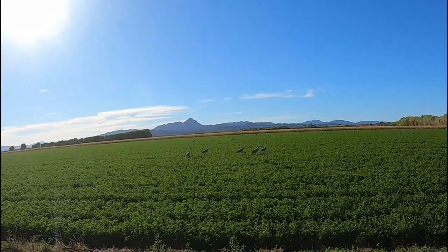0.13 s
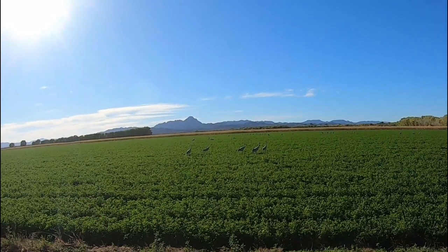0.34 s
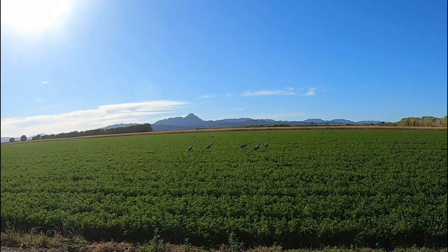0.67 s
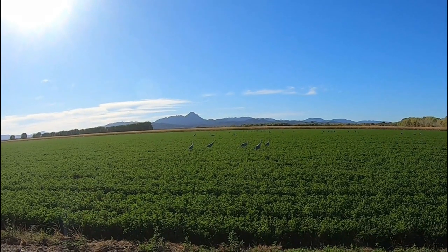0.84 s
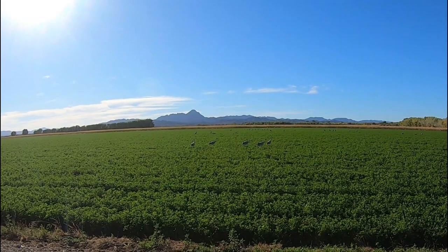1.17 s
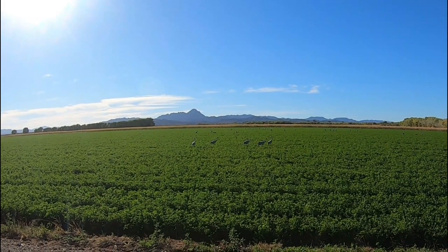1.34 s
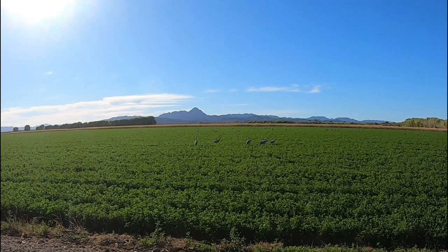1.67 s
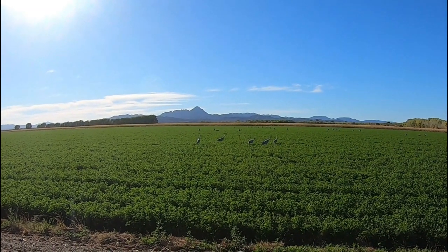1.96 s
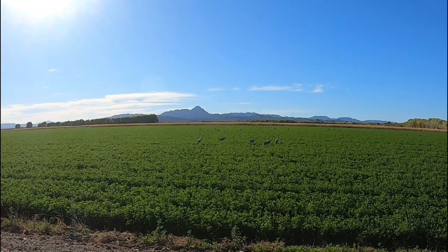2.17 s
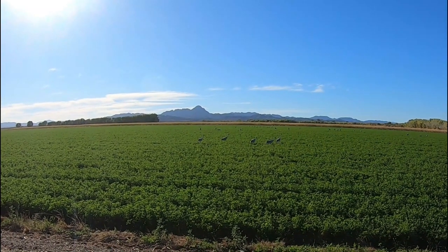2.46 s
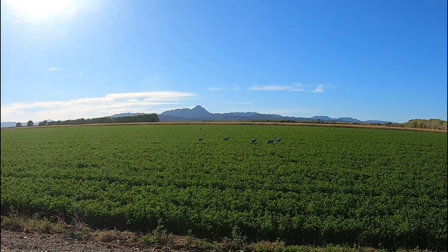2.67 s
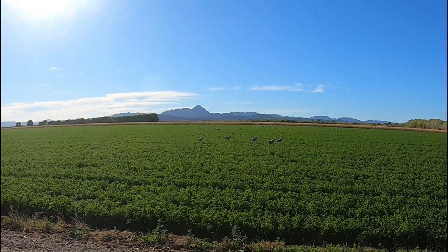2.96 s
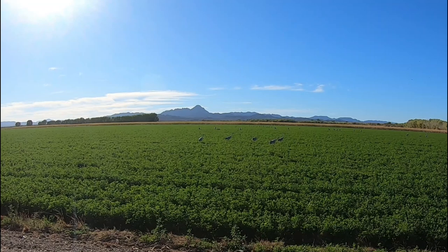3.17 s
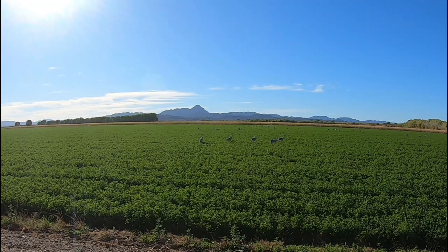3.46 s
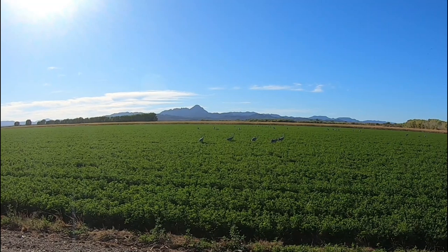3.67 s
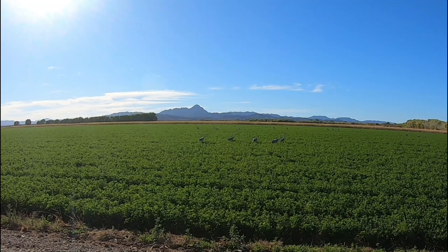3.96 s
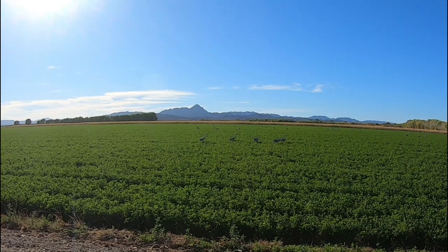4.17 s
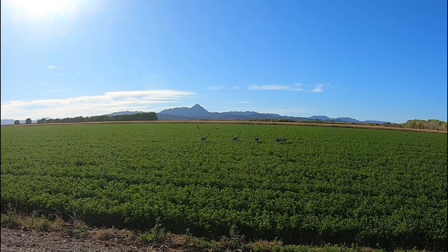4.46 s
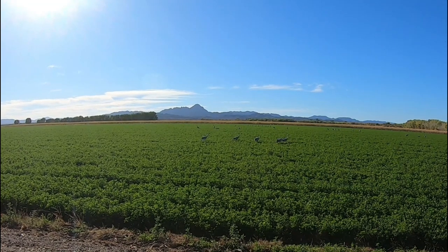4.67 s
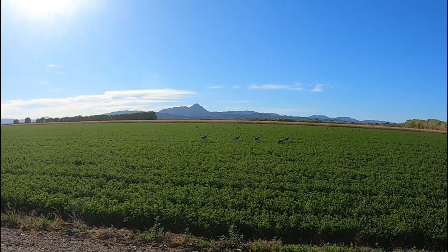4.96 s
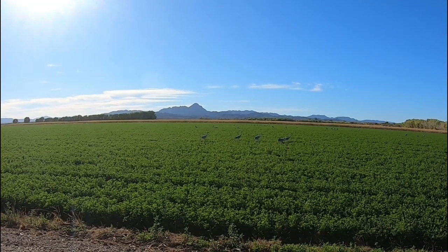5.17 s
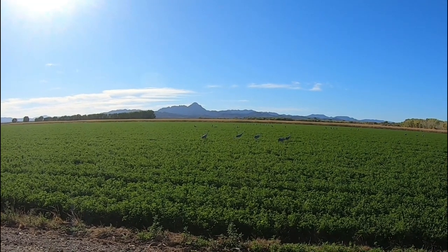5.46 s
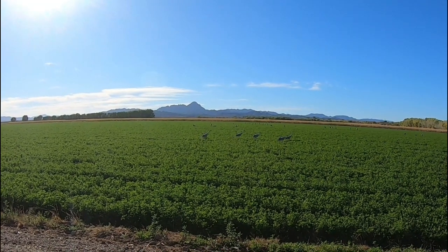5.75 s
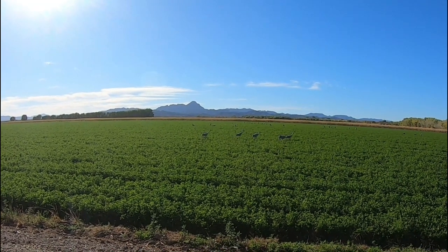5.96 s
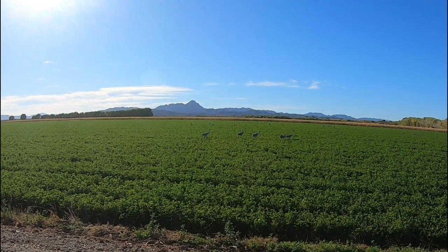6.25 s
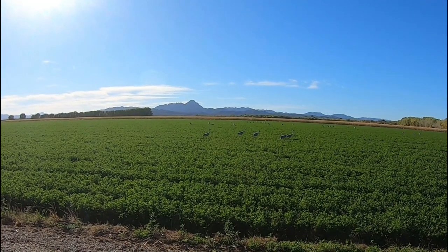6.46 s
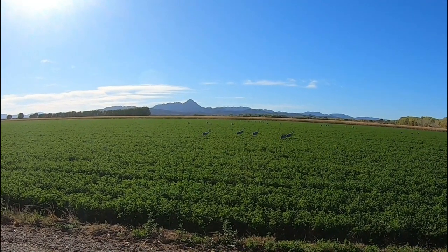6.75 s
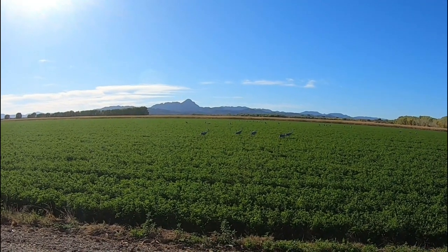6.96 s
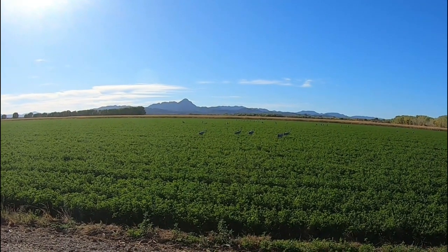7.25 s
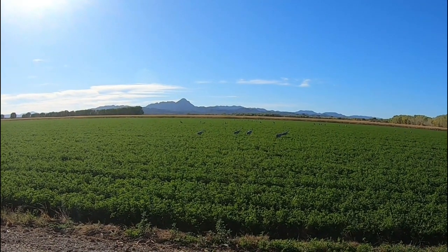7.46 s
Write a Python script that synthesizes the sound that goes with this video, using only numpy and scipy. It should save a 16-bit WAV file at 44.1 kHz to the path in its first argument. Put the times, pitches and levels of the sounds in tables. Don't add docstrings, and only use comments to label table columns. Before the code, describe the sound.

A low engine idle throbs close by throughout, around 24 pulses per second, swelling slightly near 3 s, with soft open-field hiss and light gusts through leaves, notably around 5 s. At about 0.3 s an adult crane gives a short, brassy rising bugle, immediately followed by a rolling rattle of eight quick, rough, beating notes that shorten and fade by 0.9 s. A young crane joins at 0.5 s with a thin steep whistle near 3-4 kHz, then fluttering trills drifting downward. Similar exchanges follow at about 1.9-2.6 s, 3.8-4.5 s and 5.4-6.1 s; the third bugle is softer and brighter, the last rattle longest and strongest. Faint breathy clucks from farther birds dot the scene, and the crop blurs calls into a tiny echo. After 6 s the leaves calm, a faint insect buzzes, and one weak juvenile whistle sounds at 7.5 s.

```python
import sys
import numpy as np
from scipy import signal
from scipy.fft import rfft, irfft, next_fast_len
from scipy.io import wavfile
from scipy.ndimage import map_coordinates

SR = 44100
rng = np.random.default_rng(int(sys.argv[2]) if len(sys.argv) > 2 else 0)


def convert_level_to_amplitude(level_db):
    exponent = np.asarray(level_db, float) / 20
    return 10 ** exponent


def to_wav(sig):
    pcm = np.clip(np.atleast_2d(sig), -1, 1) * 32767
    pcm = np.round(pcm).astype(np.int16)
    wavfile.write(sys.argv[1], SR, pcm.T)


N = 335601


def unit(x):
    return x / np.sqrt(np.mean(x ** 2) + 1e-20)


def along(points, hz):
    f, v = np.transpose(points)
    return np.interp(np.log(hz + 1), np.log(f + 1), v)


def curves(rows, t):
    s, *cols = np.transpose(rows)
    return [np.interp(t, s, c) for c in cols]


def wobble(rate, size=N):
    knots = rng.standard_normal(int(size * rate / SR) + 4)
    return map_coordinates(knots, [np.arange(size) * rate / SR])


def filtered(x, response):
    n = x.shape[-1]
    m = next_fast_len(n + 4096)
    return irfft(rfft(x, m) * response(np.fft.rfftfreq(m, 1 / SR)), m)[..., :n]


def add(track, s, sound):
    part = track[max(round(s * SR), 0):][:len(sound)]
    part += sound[:len(part)]


def phase(hz):
    return 2 * np.pi * np.cumsum(hz) / SR


def field():
    # hz, level_db (per Hz)
    floor = [(15, -47.5), (25, -27), (45, -15.5), (65, -14), (110, -14.5), (170, -21), (279, -24.5),
             (511, -32.5), (667, -37.5), (937, -38), (1940, -41), (2530, -49), (5360, -59.5), (9830, -74),
             (12800, -110), (21600, -120)]
    # hz, likeness (0 to 1)
    alike = [(170, 0.97), (350, 0.98), (550, 0.79), (750, 0.1), (1050, 0.086), (1500, 0.54), (2300, 0.31),
             (3500, .55), (6000, 0.076), (9000, 0.081)]
    # start_s, level_db
    insect = [(0, -92.5), (5.9, -99), (6.2, -78.5), (6.8, -82), (7.61, -89)]
    # middle_s, change_db, half_length_s
    gusts = [
        (0, 7, 0.063),
        (1.352, 7, 0.054),
        (5.1, 10, 0.2),
        (7, -9, .95),
    ]
    t = np.arange(N) / SR

    def hiss_shape(hz):
        whine = 1 + 3.55 / (1 + ((hz - 668) / 22) ** 2)
        spread = np.arccos(np.clip(along(alike, hz), -1, 1)) / 2
        return convert_level_to_amplitude(along(floor, hz)) * whine * [np.cos(spread), np.sin(spread)]

    patchy = rng.standard_normal((2, N)) * convert_level_to_amplitude(.5 * wobble(14))
    mid, side = filtered(patchy, hiss_shape)
    low = np.std(filtered(mid, lambda hz: (hz > 200) & (hz < 500)))
    hiss = np.array([mid + side, mid - side]) / low
    leaves = filtered(hiss, lambda hz: hz ** 4 / (hz ** 4 + 10600.0 ** 4))
    breeze_db = 1.4 + sum(db * np.exp(-((t - s) / half) ** 4) for s, db, half in gusts)
    buzz = unit(filtered(rng.standard_normal((2, N)), lambda hz: np.exp(-((hz - 5400) / 260) ** 2)))
    wingbeat = 1 + np.sin(2 * np.pi * 55 * t)
    buzz = buzz * convert_level_to_amplitude(curves(insect, t)[0]) * wingbeat
    return (hiss + (convert_level_to_amplitude(breeze_db) - 1) * leaves) * convert_level_to_amplitude(-51) + buzz


def engine():
    # start_s, firing_hz, first_tone_db
    idle = [(0, 24.63, -26.5), (0.53, 24.53, -25.5), (1.0, 24.37, -30.5), (1.31, 24.2, -29),
            (2.12, 24.45, -28), (2.67, 24.87, -21), (2.88, 25.61, -21), (3.03, 25.14, -22),
            (3.79, 24.34, -27.5), (3.96, 24.37, -32), (4.43, 24.39, -28.5), (4.89, 24.14, -33.5),
            (5.3, 24.1, -35), (5.81, 23.92, -30.5), (7.61, 23.77, -30.5)]
    # multiple (of the firing rate), level_db
    hum = [(1.5, -48.5), (2.5, -59), (3, -50.5), (3.5, -66), (4, -57.5), (4.5, -49.5), (5, -49),
           (5.5, -58.5), (6, -56.5), (7, -51), (8, -57.5), (9, -67), (11, -61)]
    t = np.arange(N) / SR
    hz, first_db = curves(idle, t)
    turn = phase(hz)
    second_db = -36 + 0.4946 * t - 0.22 * np.clip(first_db + 28.5, 0, None) ** 2
    out = convert_level_to_amplitude(first_db + 1.0 + 1.2 * wobble(3.8)) * np.sin(turn)
    out = out + convert_level_to_amplitude(second_db + 2.5 + 0.68 * wobble(4.6)) * np.sin(2 * turn + 1.82)
    for k, db in hum:
        angle = k * turn + .5 * wobble(3.022) + rng.uniform(0, 2 * np.pi)
        out = out + convert_level_to_amplitude(db + 2 + 1.77 * wobble(4.6)) * np.sin(angle)
    return out * convert_level_to_amplitude([[-.35], [.35]])


def clucks():
    # start_s, peak_db, centre_hz
    puffs = [(0.0249, -48, 2750), (1.1116, -56, 3000), (1.1892, -51.5, 3370), (1.353, -51.5, 2960),
             (2.657, -49.5, 3780), (2.879, -50.5, 2812), (3.1362, -46, 3100), (4.673, -46, 3372),
             (6.2095, -41, 3176), (.316, -42, 900), (5.534, -47, 850), (5.543, -35, 898)]
    out, t = np.zeros(N), np.arange(SR // 30) / SR
    for s, db, hz in puffs:
        noise = rng.standard_normal(len(t))
        puff = unit(filtered(noise, lambda f: 1 / (1 + ((f - hz) / (0.4 * hz)) ** 2) ** 2))
        shape = (1 - np.exp(-(t / 0.0023) ** 2)) * convert_level_to_amplitude(-60 * t / 0.059)
        add(out, s - .002, convert_level_to_amplitude(db - 4.5) * puff * shape)
    return out


def voiced(pitch_hz, throat, tilt_db, start=0, drift_db=0, odd_db=0, third_db=0, top_db=0):
    turn = phase(pitch_hz) + start
    voice = 0
    for k in range(1, 25):
        hz = k * pitch_hz
        level_db = along(throat, hz) + tilt_db * np.log2(k) + third_db * (k == 3)
        level_db = level_db + odd_db * (k % 2) * (k > 6) + top_db * max(k - 7, 0)
        if drift_db:
            level_db = level_db + drift_db * (1 + 1.2 * (k > 6)) * wobble(48.0, len(turn))
        voice = voice + convert_level_to_amplitude(level_db) * np.cos(k * turn + 0.36 * k) * (hz < SR / 2.5)
    return voice


def bugles():
    # crest_s, rise_hz, level_db, brightness_db (per octave)
    calls = [
        (0.406, 74.6, -32.5, 0.5),
        (2.002, 85.6, -32.5, 0.5),
        (4.002, 81.1, -36, 4),
        (5.619, 48.2, -34.5, 2.5),
    ]
    # time_s (from the crest), rise_left (share), level_db, brightness_db (per octave), hoarseness_db
    shape = [(-.087, 1.35, -17.5, 0, 3), (-.076, .95, -4, -6.5, -16), (-.06, .62, -3.5, -1.5, -35),
             (-.03, .2, -3, 1.5, -35), (-.012, 0.071, -7.5, 1.5, -33), (-.002, .06, 1.5, -1, -21),
             (.004, 0.14, -4, -8.5, 0), (.012, .2, -9, -14, -15), (0.023, 0.22, -23, -17, -24)]
    # time_s, pitch_hz
    pitches = [
        [(0.32, 536), (0.332, 532), (0.344, 557.4), (0.396, 608.6), (0.41, 598)],
        [(1.92, 527), (1.926, 525), (1.94, 567), (1.982, 608.3), (2.006, 610)],
        [(3.92, 523), (3.934, 554), (3.978, 605), (4.006, 609)],
        [(5.55, 559), (5.58, 614), (5.604, 630.4), (5.623, 606)],
    ]
    odd_levels = [-2, 4, 1.5, 1.5]
    # hz, level_db
    turned = [(450, -26), (600, -12.5), (850, 4), (1200, -0.5), (1800, -6), (2400, -18.5), (3050, -19),
              (3600, -9), (4250, -34), (4900, -25.5), (5500, -31), (7500, -40), (9800, -46), (16000, -82)]
    level_head = [(450, -35), (600, -4.5), (850, 5), (1200, 0), (1800, -3), (2400, -15), (3050, -9.5),
                  (3600, -12.5), (4250, -25), (5500, -30), (7500, -43), (9800, -46), (12500, -68),
                  (16000, -83)]
    lowered = [(450, -25), (600, -4.5), (850, 9), (1200, -2), (1800, -4), (2400, -15.5), (3050, -14.5),
               (3600, -13.5), (4250, -24), (4900, -23), (5500, -27), (7500, -43), (9800, -53), (16000, -83)]
    raised = [(450, -25), (620, -1.5), (850, 10.5), (1240, -2), (1870, -1.5), (2500, -20), (3120, -8.5),
              (3750, -17), (4350, -18), (5000, -25), (5600, -22), (7500, -49), (9800, -53), (16000, -78.5)]
    throats = [turned, level_head, lowered, raised]
    full_rise_hz, least_lead = 84.3, 0.67
    out = np.zeros(N)
    for (s, rise_hz, level_db, bright_db), pitch, odd_db, throat in zip(calls, pitches, odd_levels, throats):
        effort = rise_hz / full_rise_hz
        lead = least_lead + (1 - least_lead) * effort
        t = np.arange(lead * shape[0][0], shape[-1][0], 1 / SR)
        rising = t < 0
        left, db, tilt_db, hoarse_db = curves(shape, np.where(rising, t / lead, t))
        hz = curves(pitch, s + t)[0] + 3000 * np.clip(t - .003, 0, 1)
        weak = (1 - effort) * np.clip(left - .2, 0, .6) * rising
        tilt_db = tilt_db + bright_db - 7 * weak
        hoarse_db = np.minimum(hoarse_db + 50 * weak, 0)
        third_db = -20 * np.clip(left - .25, 0, .8) * rising
        top_db = -3.5 * np.clip(left - .1, 0, 1) * rising
        hz = hz * (1 + 0.0006 * wobble(160, len(t)))
        voice = voiced(hz, throat, tilt_db, drift_db=1.4, odd_db=odd_db, third_db=third_db, top_db=top_db)
        breath = rng.standard_normal(len(t))
        breath = unit(filtered(breath, lambda f: convert_level_to_amplitude(along(throat, f)) / (1 + (f / 4200) ** 4)))
        ends = signal.windows.tukey(len(t), .1)
        add(out, s + t[0], convert_level_to_amplitude(db + level_db + 1.5) * (voice + convert_level_to_amplitude(hoarse_db) * breath) * ends)
    return out


def rattle_notes():
    # start_s, peak_db, lower_fold_db
    calls = [
        [(0.4724, -24, 1.5), (0.547, -19, -5), (0.6057, -22, -0.5), (0.6548, -20.5, -8.5), (0.7017, -23, -3.5),
         (0.7422, -27.5, 0.5), (0.7848, -29.5, -0.5), (0.8235, -35.5, -3)],
        [(2.0662, -23.5, 1), (2.1394, -19.5, -4), (2.2005, -19.5, -6), (2.2506, -19, -10), (2.2965, -23.5, -3),
         (2.339, -24, -3), (2.3789, -25.5, 0.5), (2.419, -29, -0.5)],
        [(4.067, -22.5, 0.5), (4.141, -19, -4.5), (4.2, -19.5, -5), (4.2497, -18.5, -5.5), (4.298, -20.5, -4.5),
         (4.341, -21, -5.5), (4.3815, -24, -6), (4.4216, -26.5, -2), (4.457, -46.5, 17.5)],
        [(5.686, -20.5, -4), (5.758, -18.5, -6.5), (5.8161, -18.5, -6.5), (5.8676, -19, -7.5),
         (5.9119, -19.5, -7), (5.9545, -21.5, -6), (5.9914, -24.5, -2), (6.0298, -31, 3.5), (6.065, -44, 12.5)],
    ]
    brights = [-2.5, -1.35, 1.5, 2]
    sheens = [4, 2.5, -7, 0.5]
    touches = [-11, -7, -2, -3]
    for notes, bright_db, sheen_db, touch_db in zip(calls, brights, sheens, touches):
        for s, db, lower_db in notes:
            since = s - notes[0][0]
            upper_hz = 906.4 - 4900 * max(since - 0.1974, 0) ** 2
            life_s = 0.0066 + 0.019 * np.exp(-since / 0.31)
            yield s, db, upper_hz, lower_db, life_s, bright_db, sheen_db, since == 0, touch_db


def windpipe_rings(t, life_s, first):
    size = len(t)
    pipe_hz = 1748 * (1 - 0.32 * t) + 9 * wobble(150, size)
    pipe = convert_level_to_amplitude(-8 + 1.5 * wobble(100, size)) * np.exp(-t / (1.1 * life_s)) * np.cos(phase(pipe_hz))
    lower = convert_level_to_amplitude(-19 + 9 * first) * np.minimum(t / 0.022, 1) * np.sin(2 * np.pi * (1600 - 48 * first) * t)
    nasal_db = -22.5 + 3 * wobble(120, size)
    nasal = convert_level_to_amplitude(nasal_db) * np.sin(phase(2233 + 40 * wobble(120, size)))
    return pipe + lower + nasal


def rattle():
    # hz, level_db
    throat = [(450, -56), (650, -4), (850, 8.5), (1150, -2.5), (1450, -16.5), (1720, -5.5), (2150, -8.5),
              (2620, -22), (3300, -9), (4100, -21), (5600, -26), (9500, -47), (12000, -59.5),
              (16000, -83.5)]
    out, t = np.zeros(N), np.arange(SR // 16) / SR
    rise = np.clip(t / 0.0031, 0, 1)

    def unsteady():
        return 1 + .009 * wobble(150, len(t))

    for s, db, hz, lower_db, life_s, bright_db, sheen_db, first, touch_db in rattle_notes():
        shut = 0.78 * np.exp(-(t / (1.26 * life_s)) ** 4) + 0.086 * np.exp(-(t / (1.7 * life_s)) ** 2)
        upper_hz = hz * (.985 + 0.094 * np.exp(-t / 0.0026)) * unsteady()
        upper_gain = convert_level_to_amplitude(-2 * first + 2.9 * np.exp(-t / 0.0044)) * np.exp(-t / (0.51 * life_s * 1.86 ** first))
        upper = upper_gain * voiced(upper_hz, throat, -4.5 + bright_db)
        lower_hz = (hz - 90 - 20 * first) * (1 - 0.24 * t) * unsteady()
        lower_gain = convert_level_to_amplitude(lower_db) * np.exp(-t / (3 * life_s))
        lower = lower_gain * voiced(lower_hz, throat, -8.5 + 6 * first + bright_db, start=2.75)
        rings = windpipe_rings(t, life_s, first)

        recoil = convert_level_to_amplitude(-17 + 6.5 * (life_s < .015)) * np.exp(-((t - .0102) / 0.006) ** 2)
        recoil = recoil * np.sin(2 * np.pi * 1960 * t + rng.uniform(0, 2 * np.pi))

        def air_colour(f):
            level_db = along(throat, f) + (3 + bright_db) * np.log2(f / 850 + .1)
            return convert_level_to_amplitude(level_db) * np.where(f < 1150, .35, 1)

        air = unit(filtered(rng.standard_normal(len(t)), air_colour))
        crack = convert_level_to_amplitude(-5) * np.exp(-t / 0.0065) * np.clip(t / 0.00056, 0, 1)
        rasp = convert_level_to_amplitude(-8.5) * rise * np.exp(-t / (1.84 * life_s)) * shut
        chest = convert_level_to_amplitude(-17.0) * np.sin(2 * np.pi * 625 * t) * t / 0.013 * np.exp(1 - t / 0.0098)
        note = rise * shut * (upper + lower + rings) + (crack + rasp) * air + chest + recoil

        bumps = rng.standard_normal(80)

        def note_colour(f):
            top_db = sheen_db / (1 + (7600 / (f + 1)) ** 4)
            return convert_level_to_amplitude(top_db + 1.4 * (f > 1100) * np.interp(f / 220, range(80), bumps))

        note = filtered(note, note_colour)
        add(out, s - .001, convert_level_to_amplitude(db - 5.5) * note)
        touch = (note + .25 * rise * air) * np.exp(-(t / 0.003) ** 4)
        touch = filtered(touch, lambda f: 1 / (1 + (f / 2390) ** 4))
        add(out, s - .0065, convert_level_to_amplitude(db + (db + 23.5) - 14.5 + touch_db - 9 * first) * touch)
    return out


def thin_voice(hz, gain, s, rough):
    # time_s, octave_db
    facing = [
        (.8, -17.5),
        (2.3, -23),
        (4.05, -27),
        (5.6, -20),
        (7.5, -24),
    ]
    turn = phase(hz)

    def fuzz(share):
        return 1 + share * wobble(1500, len(hz))

    base = fuzz(1 / 5) * np.sin(turn)
    octave = fuzz(rough) * np.sin(2 * turn) + convert_level_to_amplitude(-13.5) * rough * fuzz(.7) * np.sin(3 * turn)
    return gain * (base + convert_level_to_amplitude(curves(facing, s)[0]) * octave)


def whistles():
    # time_s, pitch_hz, level_db
    calls = [
        [(.5, 2960, -66), (.51, 3080, -54), (.525, 3230, -43), (.536, 3410, -34), (.545, 3795, -26),
         (.551, 4300, -42), (.566, 3960, -62)],
        [(2.098, 2970, -63), (2.114, 3196, -50), (2.134, 3405, -33), (2.142, 3760, -32), (2.149, 4080, -32),
         (2.165, 4200, -46), (2.172, 4050, -64)],
        [(3.755, 2830, -72), (3.779, 3130, -51), (3.788, 3280, -36.5), (3.7915, 3330, -49), (3.797, 3613, -36),
         (3.806, 3810, -45), (3.826, 3760, -70)],
        [(5.362, 2940, -72), (5.382, 3150, -51), (5.396, 3534, -41.5), (5.406, 3518, -34), (5.417, 3910, -43),
         (5.421, 3800, -63), (5.44, 3700, -70)],
        [(7.49, 2910, -76), (7.504, 2900, -64), (7.528, 3390, -40.5), (7.538, 3772, -39), (7.546, 3760, -56),
         (7.56, 3620, -74)],
    ]
    beside_levels = [-32, -30, -13, -20, -20]
    out = np.zeros(N)
    for rows, beside_db in zip(calls, beside_levels):
        t = np.arange(rows[0][0], rows[-1][0], 1 / SR)
        size = len(t)
        hz, db = curves(rows, t)
        hz = hz + 70 * wobble(250, size)
        gain = convert_level_to_amplitude(db + 2.2 * wobble(162, size))
        beside = convert_level_to_amplitude(beside_db + 3.1 * wobble(150, size)) * np.sin(phase(hz + 670 + 60 * wobble(110, size)))
        add(out, t[0], thin_voice(hz, gain, t[0], rough=0.6) + gain * beside)
    return out


def trills():
    # start_s, level_db, length_s, centre_hz
    bursts = [(0.63, -27.5, 0.019, 4000), (0.6963, -30, 0.024, 4040), (0.755, -28, 0.025, 3920),
              (0.805, -29, 0.027, 3770), (0.853, -30.5, 0.0332, 3630), (.902, -36, 0.039, 3460),
              (0.943, -46, 0.047, 3096), (2.2347, -28.5, .021, 4270), (2.298, -29, 0.024, 4160),
              (2.358, -29, 0.023, 4100), (2.4116, -30.5, 0.029, 3840), (2.46, -33.5, 0.035, 3660),
              (2.515, -40.5, 0.034, 3320), (3.893, -33, 0.025, 4110), (3.967, -28.5, 0.021, 4150),
              (4.024, -33, 0.028, 4030), (4.074, -32, .032, 4060), (4.124, -35.5, 0.039, 3880),
              (4.177, -35.5, 0.035, 3750), (4.231, -49, 0.033, 3470), (5.503, -31.5, 0.024, 4170),
              (5.567, -29, 0.026, 4200), (5.629, -30, 0.028, 3940), (5.681, -29.5, 0.031, 3673),
              (5.733, -31.5, 0.031, 3590), (5.792, -46, 0.028, 3130)]
    ahead = [0.7, .1, 2, 0.3, 1, 0.3, 0.4, -0.1, -0.8, .8, -0.2, .1, 3.5, 0.5, .1, -1.5, 0.7, -0.5, -1.8, 0,
             2.4, -0.7, 2.5, 1.3, 1.1, 2]
    warble_hz, ceiling_hz = 125.7, 4850
    slack_hz, taut_hz = 3170, 4070
    out = np.zeros(N)
    for (s, db, length, hz), ahead_ms in zip(bursts, ahead):
        t = np.arange(-.001, length, 1 / SR)
        blip = t < .004
        swing_hz = 347 + 427 * ((hz - slack_hz) / (taut_hz - slack_hz)) ** 2
        swing = 0.79 * np.arcsin(0.91 * np.cos(2 * np.pi * warble_hz * (t + ahead_ms / 1000)))
        slide = 2.6 * np.clip((hz - 3200) / 250, -.4, 1) * (t - length / 2)
        pitch = hz * (.98 + slide) + swing_hz * np.where(swing < 0, .85, 1) * swing
        pitch = pitch + 60 * wobble(297, len(t))
        pitch = np.where(pitch > ceiling_hz, ceiling_hz + (pitch - ceiling_hz) / 4, pitch)
        pitch = np.where(blip, min(3800, hz) - 230000 * t, pitch)
        fade = np.clip(t / 0.0012 + 0.4, 0, 1) * np.clip((length - t) / .007 + 0.061, 0, 1)
        gap = 1 - .98 * np.exp(-((t - .0045) / .0017) ** 4)
        dips = 1 - np.clip(1.6 - swing_hz / 600, .3, .98) * np.clip(.45 - swing, 0, 1)
        pulse = convert_level_to_amplitude(3.2 * wobble(400, len(t)) - 7.5 * blip)
        add(out, s - .001, thin_voice(pitch, convert_level_to_amplitude(db) * gap * dips * pulse * fade, s, rough=0.56))
    return out


def young_bird():
    # hz, level_db
    beak = [(2400, -11), (3000, 5.5), (3600, 0.5), (4300, -3.5), (5200, -5.5), (6500, -0.5), (7600, -1),
            (8500, -5.5), (9300, 0.5), (10300, -11), (15000, -8)]
    return filtered(whistles() + trills(), lambda f: convert_level_to_amplitude(along(beak, f)))


def scattered(x):
    # hz, fade_s (to -60 dB), level_db
    crop = [(500, 0.07, -6), (1200, 0.06, -5), (1960, 0.04, 1), (4000, 0.09, -4), (7000, 0.1, 3),
            (12000, 0.088, 3)]
    fade_s = [row[:2] for row in crop]
    level_db = [row[::2] for row in crop]
    out, turn = 0, np.pi * 9 * np.arange(N) / SR
    for share in np.cos(turn), np.sin(turn):
        hz, t, z = signal.stft(rng.standard_normal((2, SR // 6)), SR, nperseg=128)
        tail = signal.istft(z * convert_level_to_amplitude(-60 * t / along(fade_s, hz)[:, None]), SR, nperseg=128)[1]
        tail = filtered(tail / np.linalg.norm(tail[0]), lambda f: convert_level_to_amplitude(along(level_db, f)))
        late = np.pad(share * x, (100, 0))[None]
        out = out + signal.oaconvolve(late, tail, axes=1)[:, :N]
    return out


def two_ears(x):
    # hz, left_minus_right_db
    ear_levels = [(300, -11.5), (600, 2.5), (1100, -2), (1400, 1), (1700, 7.5), (2400, 3), (2900, -0.3),
                  (4500, 1), (6000, 4), (6700, -4), (8500, 5.5), (11000, 0.5)]
    # hz, left_lead_radians
    ear_leads = [(300, 0), (1050, 0), (1400, .45), (1750, 1.1), (1900, 3.4), (2060, 5.7), (3500, 6.3),
                 (5200, 6.8), (7300, 6.9), (8300, 7.8), (9800, 7.7), (13000, 7.2)]
    side = np.array([[.5], [-.5]])
    return filtered(x, lambda hz: convert_level_to_amplitude(side * along(ear_levels, hz)) * np.exp(1j * side * along(ear_leads, hz)))


def scene():
    birds = bugles() + rattle() + young_bird() + clucks()
    return two_ears(birds) + convert_level_to_amplitude(-6.5) * scattered(birds) + engine() + field()


def top_cut(x):
    return signal.sosfilt(signal.butter(12, 15400, fs=SR, output="sos"), x)


def record(dry):
    mix = dry + convert_level_to_amplitude(-99) * rng.standard_normal(dry.shape)
    return top_cut(mix)


dry = scene()
out = record(dry)
to_wav(out)
```